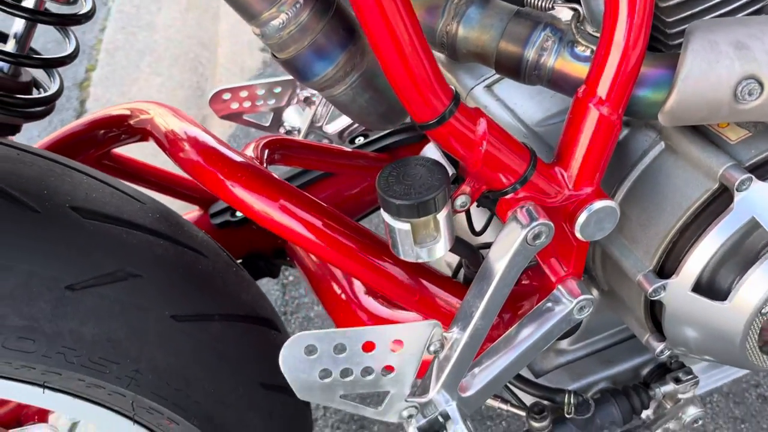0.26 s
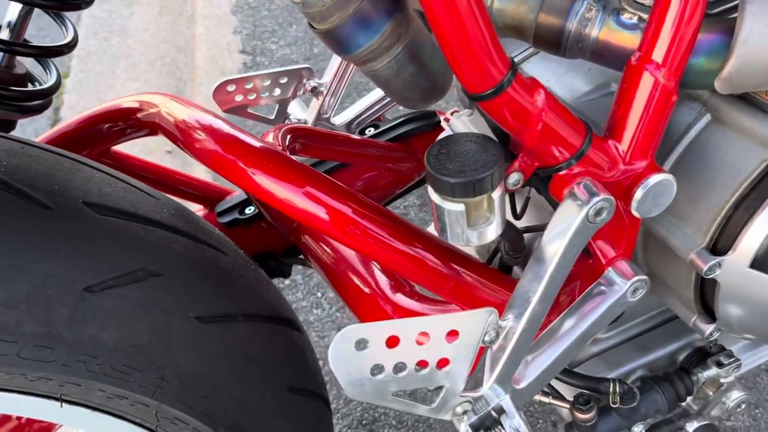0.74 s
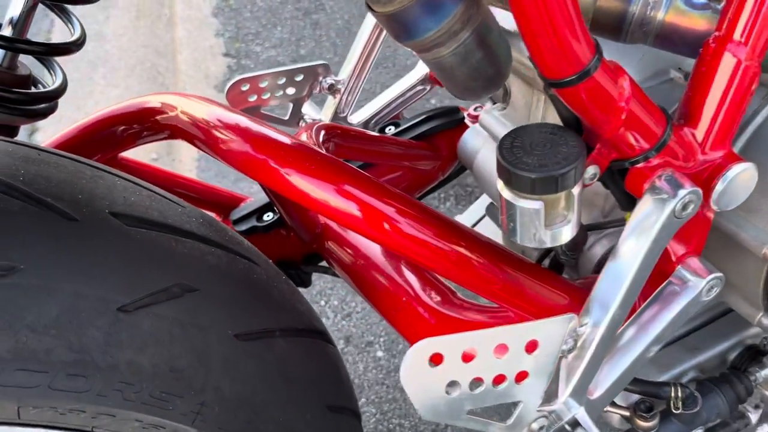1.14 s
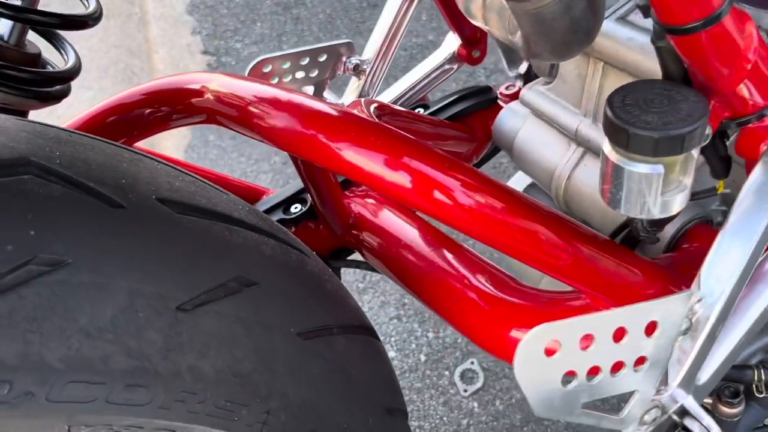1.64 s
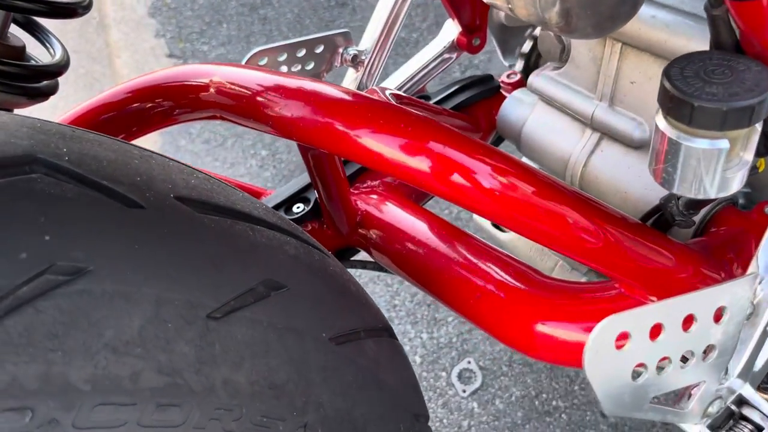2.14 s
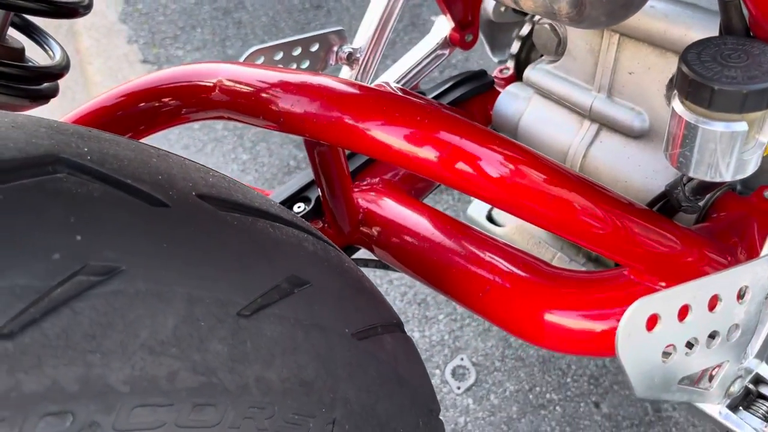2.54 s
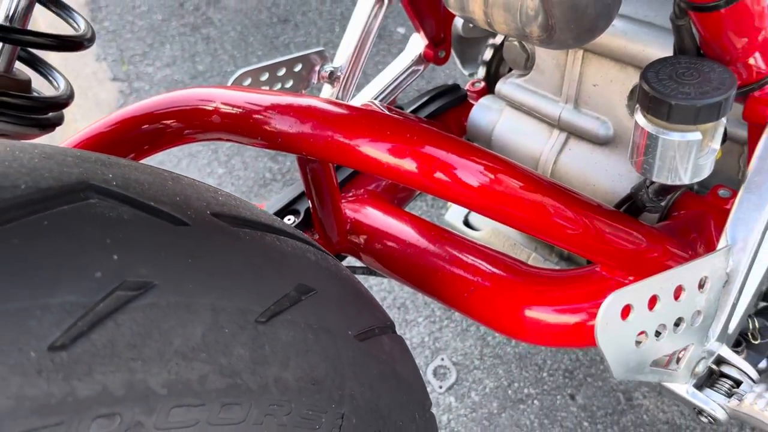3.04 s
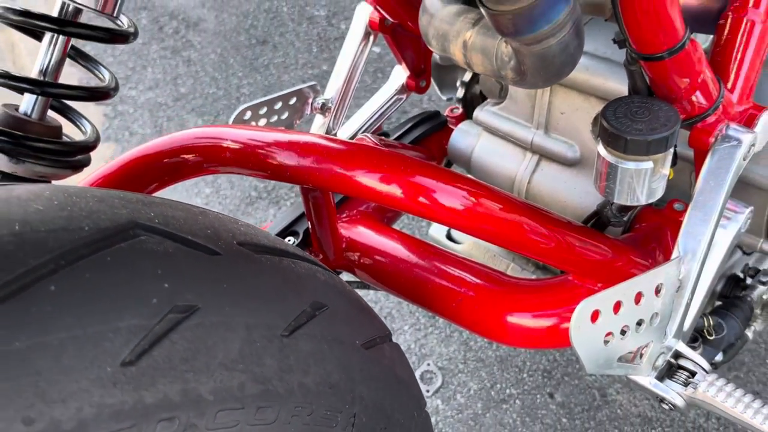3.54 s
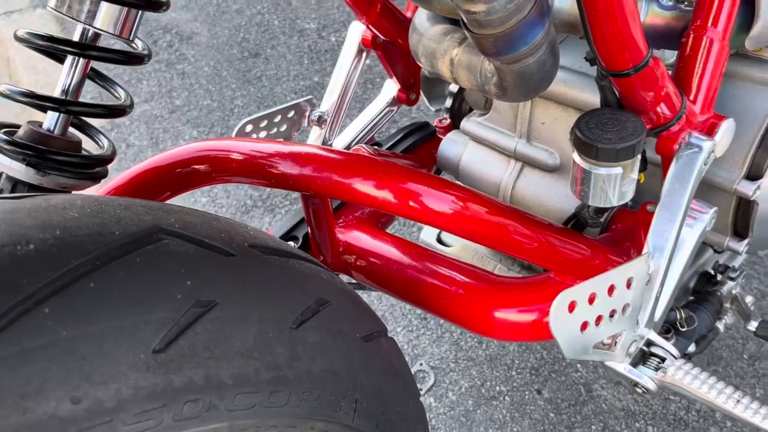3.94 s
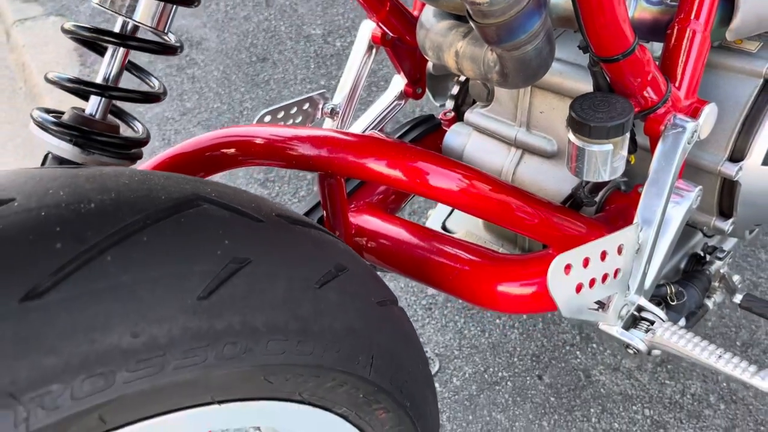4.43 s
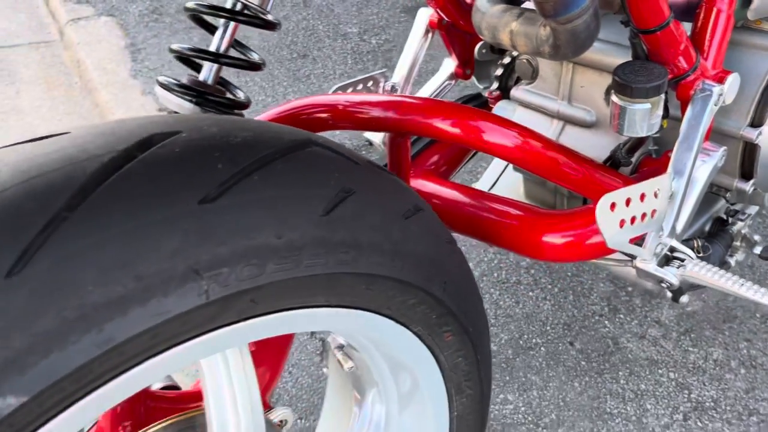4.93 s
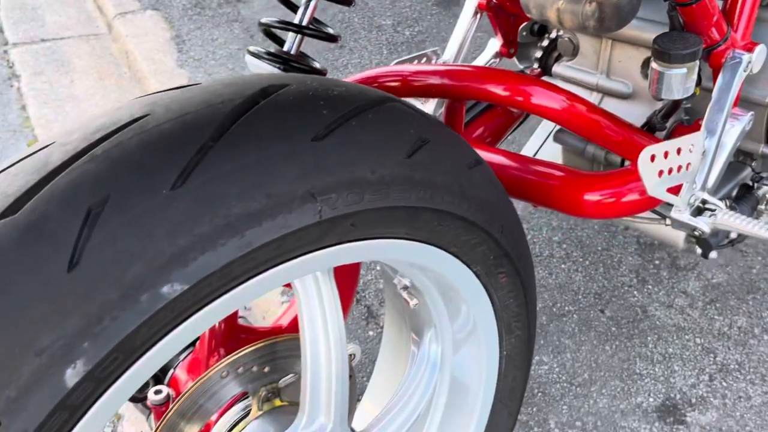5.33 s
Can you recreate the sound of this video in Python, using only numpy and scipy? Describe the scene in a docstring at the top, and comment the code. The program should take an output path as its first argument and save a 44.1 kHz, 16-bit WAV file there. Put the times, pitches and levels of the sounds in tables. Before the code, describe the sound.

A twin-cylinder motorcycle is already idling at 0 s, heard from arm's length outdoors on a hand-held stereo phone, dry and close. Exhaust pulses come in uneven pairs, roughly six or seven pairs a second, with short low thumps around 60 to 160 Hz, each followed by a soft gassy puff. Some firings are weak or almost missing, so the idle lopes. Over it runs a continuous dry clatter: loose clutch plates and valve gear clacking against metal cases, several hits per cycle, with bright gritty rattle, small ticks, gear whirr and thin ringing between hits. From 0 to 1.5 s the metal is prominent and the exhaust moderate. Around 1.7 to 3 s the metallic tone shifts as the phone leans in, while the thumps strengthen. From 3.5 s the bark becomes fuller, and it is heaviest after 5 s, with pounding bass over the persistent clatter. It ends near 5.6 s, still idling.

```python
"""At arm's length from a twin-cylinder motorcycle, a hand-held phone drifts towards the tailpipe of the uneven idle.
Each firing rings its cylinder's exhaust pipe with decaying sines, and noisy gas follows.
Loose clutch plates and valve gear clack against the metal cases over a whirr: noise bursts through resonances.
Narrow bands of noise make the parts that keep singing between the clacks.
The two microphone ports hear the metalwork with a phase of their own."""
import sys
import numpy as np
from scipy import signal
from scipy.fft import rfft, irfft
from scipy.io import wavfile
from scipy.ndimage import uniform_filter1d

SR = 44100
rng = np.random.default_rng(int(sys.argv[2]) if len(sys.argv) > 2 else 0)


def attenuation_scalar(level_db):
    """Turn a level in dB into a linear amplitude multiplier (20 dB per decade)."""
    decades = np.asarray(level_db, float) / 20
    return 10 ** decades


def pcm_store(signal):
    """Save signal as 16-bit PCM."""
    levels = np.round(np.clip(np.atleast_2d(signal), -1, 1) * 32767)
    wavfile.write(sys.argv[1], SR, levels.astype(np.int16).T)


N = 246078

# The cylinders taking turns, lead first. Each row: start in seconds, relative bark in dB,
# relative level of the clacking that goes with it in dB.
FIRINGS = [(-0.062, -41, -31), (-0.023, -36, -31.5), (0.0467, -26, -20.5), (0.089, -17.0, -22),
           (0.158, -25, -24), (0.2, -17, -22.5), (0.27, -22.5, -22), (0.307, -27, -22), (0.381, -26, -27.5),
           (0.424, -14, -21.5), (0.4928, -20.5, -17), (0.5304, -28, -25.5), (0.6004, -23, -24),
           (0.6406, -14, -19.5), (0.7125, -25, -30.5), (0.751, -21, -25), (0.8289, -19.0, -24.5),
           (0.8712, -15.5, -22.0), (0.9393, -27, -23.5), (0.9753, -29, -22.5), (1.055, -20, -20.5),
           (1.0969, -14.0, -24.7), (1.1661, -19, -22), (1.205, -18, -23.4), (1.2752, -26, -24.5),
           (1.314, -14.5, -22), (1.3801, -19.5, -27), (1.4206, -37, -26.5), (1.496, -19.5, -26.5),
           (1.5373, -12.0, -23.5), (1.6076, -25.0, -27), (1.6443, -35, -28.5), (1.729, -17, -18.5),
           (1.7673, -10, -25), (1.8292, -25, -29.1), (1.8655, -21.5, -25.5), (1.9353, -14.5, -22.5),
           (1.9716, -10, -23.6), (2.0325, -33, -30.2), (2.065, -35, -25.5), (2.1337, -15, -24.5),
           (2.1704, -12.0, -26.5), (2.234, -21, -27.5), (2.2732, -12.5, -26.5), (2.3389, -15.5, -23.4),
           (2.3767, -33, -27.5), (2.4448, -19, -25), (2.4836, -10.5, -28.5), (2.548, -20, -30),
           (2.588, -46, -26), (2.663, -17.0, -24), (2.7023, -9.5, -24.5), (2.7645, -22.0, -32),
           (2.8037, -14, -30.5), (2.8717, -15, -26), (2.9085, -12, -26), (2.974, -19.0, -32),
           (3.011, -19, -26.5), (3.0831, -15.5, -28.5), (3.12, -9, -22.5), (3.1831, -17.5, -28),
           (3.2184, -35, -24), (3.2916, -15, -27), (3.332, -8.5, -23), (3.397, -25, -33),
           (3.441, -35, -26.5), (3.517, -15.5, -18), (3.5546, -7.5, -23.5), (3.615, -29, -33),
           (3.6545, -19, -29), (3.733, -14, -22), (3.7717, -7.5, -21.5), (3.83, -31, -30),
           (3.8638, -58, -28), (3.935, -13, -26.5), (3.97, -7, -25), (4.0317, -30, -30),
           (4.0782, -19, -27.5), (4.1437, -12.5, -24.5), (4.1829, -7.5, -25), (4.2448, -35.0, -32),
           (4.2879, -15, -26), (4.3632, -11, -20), (4.3991, -8, -23.5), (4.4626, -25, -29),
           (4.5044, -42, -23), (4.5788, -12.7, -23), (4.6165, -6.5, -27.5), (4.684, -24, -29),
           (4.724, -10, -24), (4.7962, -11.5, -21), (4.8311, -8, -27), (4.896, -17, -27.5),
           (4.9341, -9.0, -25.5), (5.0046, -12, -26), (5.045, -5, -26), (5.1134, -13, -27),
           (5.1509, -12.0, -28.4), (5.231, -12, -30), (5.2707, -2, -23), (5.3352, -10.5, -28),
           (5.381, -27, -27), (5.4467, -9.0, -28.2), (5.4886, -2, -24.5), (5.556, -11, -30),
           (5.595, -25, -22.5)]
# How the boom follows the bark, lead cylinder then trailing one. Each row: offset in dB,
# boom in dB per dB of bark, least boom in dB even for a lean firing.
BOOM_RULES = [(-0.5, 0.93, -24), (-3.5, 0.62, -16.5)]
# Exhaust path of each cylinder at full pitch. Each row: frequency in Hz, level against the firing in dB,
# time to fall by 60 dB in seconds, polarity (1 or -1).
LEAD_PIPE = [(63.3, 2.2, .336, -1), (85.7, 15.6, .021, 1), (87.3, -14.5, .5, 1), (135, 11.2, .034, -1),
             (198.5, -2.2, .063, 1), (300.7, -20, .135, -1)]
TRAILING_PIPE = [(68.3, -2.5, .204, -1), (86.3, -1.9, .163, 1), (157.9, 15.6, .053, -1),
                 (163, 15.4, .044, 1), (224.8, -5.5, .088, 1), (273.1, -2.5, .021, -1)]
# The phone turns while it drifts. Each row: time in seconds, right port against left in dB.
PHONE_TURN = [(0, 1), (2, -1.5), (4, -3.5), (5.58, -2)]
# The phone leans in and draws back. Each row: time in seconds, closeness (0 to 1).
CLOSENESS = [(0, 0), (1.1, 0.09), (1.7, 0.78), (2.4, 0.9), (3.0, 0.66), (4.0, 0.09), (5.58, 0.2)]
# Clacks tied to the lead firing. Each row: milliseconds before it, added case knock in dB, tick in dB
# and plate ring in dB, dB per dB of the firing's clacking.
LEAD_CLACKS = [(28.7, -7, -19.5, -12, 1.04), (13.85, 6.5, 6.5, 11, 0.94)]
# Clacks timed from the lead to the trailing firing. Each row: share of that gap, added knock in dB, tick in dB
# and ring in dB, dB per dB of healthy trailing bark.
PAIR_CLACKS = [(0.429, 5, 3.5, 11, -0.01), (.72, 6, 5, 6, 0.14), (1.3, -7.5, -30, -9, -0.4)]
# Whirr of gears and belts at a steady effort. Each row: time in seconds, relative low part in dB, high part in dB.
WHIRR = [(0, -35, -34.5), (2.6, -32, -33), (5.58, -34.5, -38.5)]
# Basic colour of the metalwork in the sum and in the difference of the two ports.
# Each row: frequency in Hz, relative density in dB per Hz.
SUM_COLOUR = [(200, 4), (330, -8.5), (680, -9.5), (1150, -14), (1670, -13), (2900, -11.5), (4100, -13.5),
              (6200, -13.5), (7100, -18), (7700, -23.5), (9800, -18), (11800, -13), (13500, -21.5),
              (15600, -50)]
DIFFERENCE_COLOUR = [(200, -4.5), (330, -19), (680, -7), (1100, -15), (1550, -13), (1940, -20.5),
                     (2900, -12), (5200, -16.5), (7300, -11.5), (9700, -14.5), (10600, -47), (11800, -30),
                     (13500, -26), (15600, -23)]
# Resonances of cases and plates. Each row: frequency in Hz, width in Hz,
# boost in the sum in dB, boost in the difference in dB.
CASE_RESONANCES = [(881, 160, 8.5, 0), (978, 30, 5.5, 13), (1306, 277, 11, 10), (1482, 34, 5, 11.5),
                   (2150, 1060, 5, 2), (3550, 26, -4.5, 7), (6545, 210, 7, -10)]
# Clutch plates, boosted more in the difference of the ports. Each row: frequency in Hz, width in Hz,
# boost in the sum in dB, boost in the difference in dB.
PLATE_RESONANCES = [(8100, 260, 2, 12), (8320, 300, 2, 10), (8520, 240, 2, 13), (9100, 600, 5, 9)]
# How the difference of the ports follows their sum. Each row: frequency in Hz, share in phase,
# share a quarter cycle ahead.
PORT_PHASE = [(300, 0.28, 0.45), (596, 0.72, 0.46), (790, -0.24, -0.4), (1470, -0.33, -0.84),
              (1800, 0.35, -0.16), (2600, 0.73, 0.26), (4400, 0.28, -0.17), (5800, -0.28, -.45),
              (7500, 0.14, -0.91), (9200, -0.077, 1), (10700, 0, .6), (13400, 0, -.33)]
# Where one kind of metal sound hands over to the next. Each entry: frequency in Hz.
BAND_EDGES = (1600, 2800, 4600, 7600, 9700)
# Parts that keep singing. Each row: frequency in Hz, width in Hz, left against right in dB.
SINGING_PARTS = [(470, 30, 5), (550, 40, 0), (1015, 70, -1), (2170, 140, 3), (2300, 150, 3), (3612, 85, 3),
                 (3760, 110, 3), (6765, 230, 0)]
# Loudness of each singing part. Each row: relative level at the start in dB, dB gained when close,
# drift in dB per second, dB per dB that the phone has turned.
SINGING_LEVELS = [(-53, 6, 1.5, -.8), (-51.5, 8, 0.2, -1.2), (-43.5, 5, -0.26, 0.6),
                  (-44.5, -11, -0.07, -1), (-40.5, -24, -1.4, 0.2), (-49.5, 4, -0.88, -2.5),
                  (-49, -7.5, -1.5, -3), (-44.5, 3, -0.06, 0.2)]


def along(table, x, log=False):
    """Reads every column of a table at x, with straight lines between the rows."""
    at, *columns = np.transpose(table)
    if log:
        x, at = np.log(x), np.log(at)
    return [np.interp(x, at, column) for column in columns]


def spikes(s, db):
    """One impulse for each event, at its time and level."""
    out = np.zeros(N)
    at = (s * SR).astype(int)
    inside = (at >= 0) & (at < N)
    np.add.at(out, at[inside], attenuation_scalar(db)[inside])
    return out


def lag(x, tau_s):
    """Lets each impulse die away exponentially from its full height."""
    return signal.lfilter([1], [1, -np.exp(-1 / (tau_s * SR))], x)


def unit(x):
    """Scales a signal to an rms of 1."""
    return x / np.sqrt(np.mean(x ** 2))


def walk(rate):
    """Random levels, rate new ones a second, joined by slopes; the spread is near 1."""
    hold = int(SR / rate)
    steps = np.repeat(rng.standard_normal(N // hold + 1), hold)
    return unit(uniform_filter1d(steps, hold)[:N])


def band(x, lo_hz, hi_hz):
    """Keeps only the sound around the range between two frequencies."""
    return signal.sosfilt(signal.butter(2, [lo_hz, hi_hz], "band", fs=SR, output="sos"), x)


def firings():
    """Rows (s, boom dB, bark dB); the boom follows the bark by its cylinder's rule."""
    s, bark_db = np.transpose(FIRINGS)[:2]
    offset, slope, least = np.resize(BOOM_RULES, (len(s), 3)).T
    boom_db = np.maximum(offset + slope * bark_db, least)
    # the boom loses a little when the phone leans in
    boom_db = boom_db - 0.36 * along(CLOSENESS, s)[0]
    return np.c_[s, boom_db, bark_db]


def pipe_rings():
    """Each firing strikes the resonances of its cylinder's pipe, which die away as sines."""
    t = np.arange(SR // 5) / SR
    margin = len(t)
    rings = np.zeros(N + 3 * margin)
    for k, (s, boom_db, bark_db) in enumerate(firings()):
        # a bark far below its boom rings up to a tenth lower and longer
        pitch = 1 - .1 * np.clip((boom_db - bark_db - 5) / 15, 0, 1)
        start = margin + int(s * SR)
        for hz, db, t60, polarity in (LEAD_PIPE, TRAILING_PIPE)[k % 2]:
            # boom below 110 Hz, bark above
            size = polarity * attenuation_scalar(db + (boom_db if hz < 110 else bark_db))
            fade = np.exp(-np.log(1000) * pitch * t / t60)
            rings[start:start + margin] += size * np.sin(2 * np.pi * hz * pitch * t) * fade
    return rings[margin:margin + N]


def exhaust():
    """Pipe rings with turbulent gas after each firing; the right port is in the phone's shadow."""
    s, boom_db = firings().T[:2]
    blows = spikes(s, boom_db)
    noise = rng.standard_normal((3, N))
    throb = attenuation_scalar(-14.0) * lag(blows, 0.072) * unit(band(noise[0], 47.0, 83.0))
    gas = [attenuation_scalar(-18.0) * lag(blows, 0.034) * unit(band(n, 139.0, 350.0)) for n in noise[1:]]
    left = pipe_rings() + throb + gas[0]
    # the shadow dulls the sound above 152 Hz
    shade = np.exp(-2 * np.pi * 152.0 / SR)
    shaded = signal.lfilter([1 - shade], [1, -shade], left)
    right = attenuation_scalar(1.0) * shaded + attenuation_scalar(-1.5) * gas[1]
    turn_db = along(PHONE_TURN, np.arange(N) / SR)[0]
    return np.array([left, right * attenuation_scalar(turn_db)])


def pace():
    """Crank effort near 1: it jumps when a cylinder fires, shortly before the bark leaves the pipe, then sags."""
    s, _, bark_db = firings().T
    push = lag(spikes(s - .018, .5 * bark_db), 0.041)
    return push / uniform_filter1d(push, SR // 2)


def clacks():
    """Clacks at set crank angles: columns s, knock, tick, ring dB; trailing bark weights the later ones."""
    s, _, clack_db = np.transpose(FIRINGS[::2])
    later, trail_db, pair_db = np.transpose(FIRINGS[1::2])
    # a healthy trailing bark grows by 1.5 dB a second as the tailpipe nears
    health = np.clip(trail_db + 29 - 1.5 * s, -14., 12.)
    lead = []
    for ms, *parts_db, follow in LEAD_CLACKS:
        lead.append([s - ms / 1000] + [follow * clack_db + db for db in parts_db])
    pair = []
    for share, *parts_db, follow in PAIR_CLACKS:
        when = s + share * (later - s)
        pair.append([when] + [pair_db + db + follow * health for db in parts_db])
    return np.concatenate(lead + pair, axis=1)


def small_ticks(per_s, spread_db, ring_s):
    """Teeth and rockers ticking at random, mostly faint, a few strong."""
    when, size = rng.random((int(per_s * N / SR), 2)).T
    # the log makes the levels uneven
    return unit(lag(spikes(when * N / SR, -spread_db * np.log(size)), ring_s))


def rattle(s, db, floor_db, small, hit_s, tail_s, tail_db, smooth_db):
    """Loudness of one part of the metalwork: a quick clack, a longer shudder, small ticks and a smooth whirr."""
    blows = spikes(s, db)
    clack = lag(blows, hit_s) - lag(blows, 0.24 * hit_s)
    shudder = attenuation_scalar(tail_db) * lag(blows, tail_s)
    # plates bounce several times within one clack
    bounce = attenuation_scalar(2.2 * walk(700))
    whirr = attenuation_scalar(floor_db) * (small + attenuation_scalar(smooth_db))
    return unit(bounce * (clack + shudder) + whirr)


def causal(db):
    """Turns a gain curve into a response that rings only after the blow (minimum phase)."""
    fold = irfft(db * np.log(10) / 20, N)
    fold[1:N // 2] *= 2
    fold[N // 2 + 1:] = 0
    return np.exp(rfft(fold))


def metalwork(effort):
    """Clacks and whirr excite cases and plates; sum and difference of the ports get their own colour."""
    s, knock_db, tick_db, ring_db = clacks()
    # no two clacks quite alike in timing or plate ring
    s = s + .001 * rng.standard_normal(len(s))
    ring_db = ring_db + 4 * rng.standard_normal(len(s))
    # the whirr swells and sags with the crank effort
    low_db, high_db = along(WHIRR, np.arange(N) / SR) + 4.2 * np.log10(effort + 0.084)
    small = small_ticks(per_s=300, spread_db=3.6, ring_s=.0022)
    # every clack lands on another spot and leans darker or brighter
    knock_lean, tick_lean = 2.0 * rng.standard_normal((len(s), 2)).T
    # last four settings: hit and tail in seconds, tail and smooth whirr in dB
    thud = rattle(s, knock_db - knock_lean, low_db, small, 0.0069, 0.0077, -46.0, 0.0059)
    knock = rattle(s, knock_db + knock_lean, low_db, small, 0.0056, 0.0091, -34.0, 1.0)
    tick = rattle(s, tick_db - tick_lean, high_db, small, 0.0039, 0.0075, -30.0, 1.5)
    click = rattle(s, tick_db + tick_lean, high_db, small, 0.0036, 0.0039, -36.0, -7.0)
    ring = rattle(s, ring_db, high_db + 8., small, .003, .015, -14., 0.)
    air = rattle(s, tick_db, high_db - 1.5, small, 0.0018, 0.0081, -13.5, -12.0)

    # dense rattling noise, slightly grainy in level
    noise = unit(rng.standard_normal((2, N)) * attenuation_scalar(1.5 * rng.standard_normal(N)))
    hz = np.maximum(np.fft.rfftfreq(N, 1 / SR), 1)
    part = np.searchsorted(BAND_EDGES, hz)
    near = np.choose(part, [rfft(e * noise[0]) for e in (thud, knock, tick, click, air, air)])
    other = np.choose(part, [rfft(e * noise[1]) for e in (thud, knock, tick, click, ring, air)])

    sum_db = along(SUM_COLOUR, hz, True)[0]
    diff_db = along(DIFFERENCE_COLOUR, hz, True)[0]
    for centre_hz, width_hz, peak_db, apart_db in CASE_RESONANCES + PLATE_RESONANCES:
        shape = 1 / (1 + (2 * (hz - centre_hz) / width_hz) ** 2)
        sum_db = sum_db + peak_db * shape
        diff_db = diff_db + apart_db * shape
    body = causal((sum_db + diff_db) / 2)
    apart = attenuation_scalar((diff_db - sum_db) / 2)

    # the difference is partly the sum shifted in phase, partly noise of its own
    in_phase, ahead = along(PORT_PHASE, hz, True)
    rest = np.sqrt(np.clip(1 - in_phase ** 2 - ahead ** 2, 0, 1))
    mid = irfft(near * body / apart, N)
    side = irfft(((in_phase + 1j * ahead) * near + rest * other) * body * apart, N)
    # the part common to both ports sits at -28 dB rms
    return attenuation_scalar(-28) / np.sqrt(np.mean(mid ** 2)) * np.array([mid + side, mid - side])


def singing(effort):
    """Narrow resonances kept alive by the crank effort and struck anew by each clack."""
    s, knock_db = clacks()[:2]
    t = np.arange(N) / SR
    close = np.clip(along(CLOSENESS, t)[0], 0, 1)
    turn_db = along(PHONE_TURN, t)[0]
    drive = unit(effort ** 0.16 + .5 * unit(lag(spikes(s, knock_db), 0.02)))
    out = 0
    for (hz, width_hz, pan_db), levels in zip(SINGING_PARTS, SINGING_LEVELS):
        start_db, close_db, drift_db, turn = levels
        db = start_db + close_db * close + drift_db * t + turn * turn_db
        # a slow sway and a quicker flutter in level
        db = db + 2.5 * walk(9) + 2.07 * walk(45)
        noise = rng.standard_normal((2, N))
        one, two = (unit(band(n, hz - width_hz / 2, hz + width_hz / 2)) for n in noise)
        left = attenuation_scalar(pan_db / 2) * (one + 0.49 * two)
        right = attenuation_scalar(-pan_db / 2) * (one - 0.5 * two)
        out = out + attenuation_scalar(db) * drive * np.array([left, right])
    return attenuation_scalar(-0.5) * out


def scene():
    """Exhaust, clacking metalwork and singing parts together."""
    effort = pace()
    return exhaust() + metalwork(effort) + singing(effort)


def band_limit(x):
    """A steep low-pass at the top of the band."""
    return signal.sosfilt(signal.butter(12, 15720, fs=SR, output="sos"), x)


def record(dry):
    """The phone cuts the deepest bass, below 50 Hz, and rounds the highest peaks."""
    cut = signal.butter(3, 50, "high", fs=SR, output="sos")
    trimmed = signal.sosfilt(cut, dry)
    mix = 1.485 * np.tanh(trimmed / 1.51)
    return band_limit(mix)


dry = scene()
out = record(dry)
pcm_store(out)
```